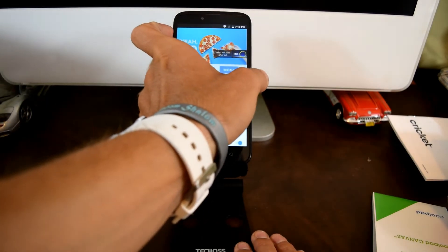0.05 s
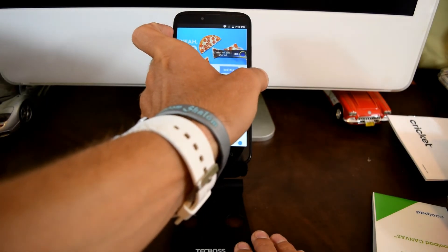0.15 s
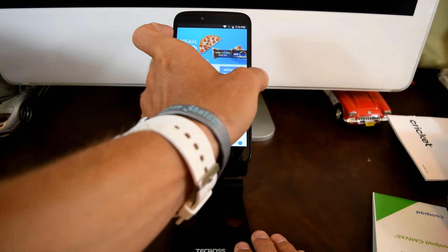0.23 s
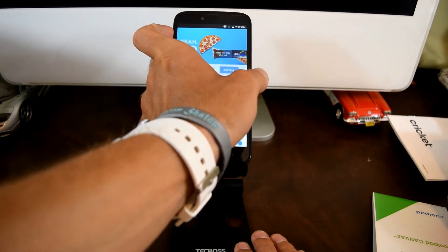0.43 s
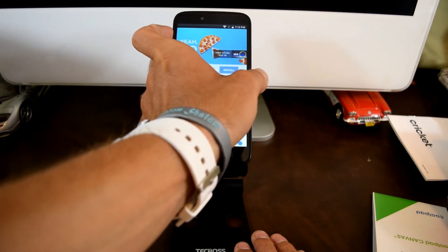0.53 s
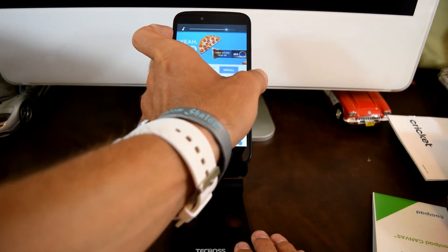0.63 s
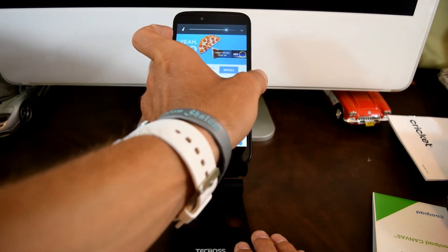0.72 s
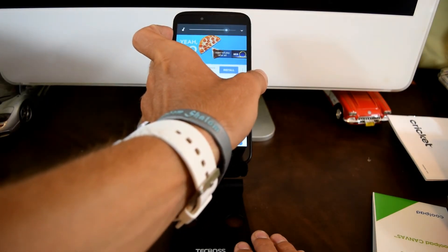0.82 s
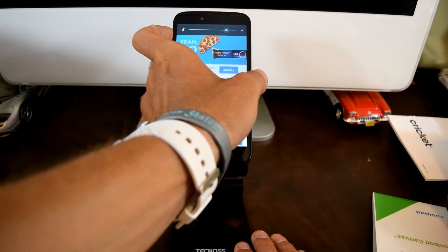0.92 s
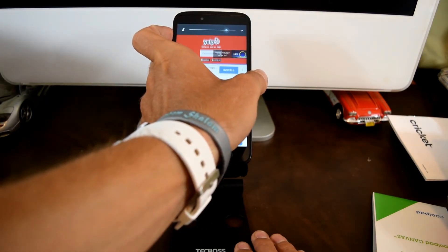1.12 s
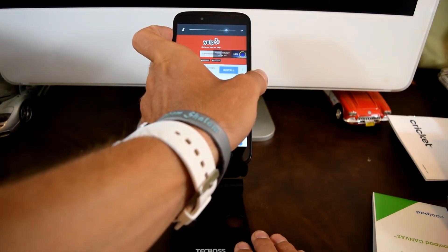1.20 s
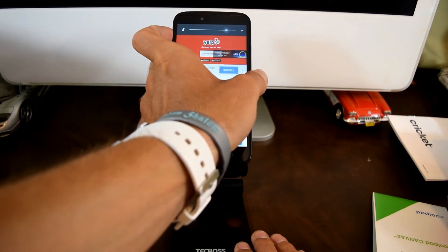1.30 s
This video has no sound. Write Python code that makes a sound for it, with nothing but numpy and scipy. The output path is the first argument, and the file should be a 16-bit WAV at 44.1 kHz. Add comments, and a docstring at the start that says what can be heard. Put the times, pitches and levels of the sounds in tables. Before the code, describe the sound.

Low, muffled thuds and dull rubbing come from a phone being handled at a desk. A button is pressed and released with two faint clicks, then the rumble settles over quiet room hum, microphone hiss and a thin whine.

```python
"""A hand grips a phone at a desk: small shifts reach the microphone as soft, deep bumps in two resonances.
The side button is pressed and clicks faintly, down and up, ringing the case.
A quiet room runs throughout: fan-like murmur, mains hum, a thin wavering whine and microphone hiss."""
import sys
import numpy as np
from scipy import signal
from scipy.fft import rfft, irfft, next_fast_len
from scipy.io import wavfile
from scipy.ndimage import map_coordinates

SR = 44100
rng = np.random.default_rng(int(sys.argv[2]) if len(sys.argv) > 2 else 0)


def int16_out(signal):
    """Quantize to a 16-bit WAV file."""
    q = np.round(np.clip(np.atleast_2d(signal).T, -1, 1) * 32767)
    wavfile.write(sys.argv[1], SR, q.astype(np.int16))


N = 59535

# room murmur spectrum (frequency [Hz], relative density [dB])
MURMUR_SPECTRUM = [(10, -31), (25, -10.5), (50, -3), (75, -6), (130, -0.5), (200, 0.5), (245, -4.5),
                   (280, -18), (345, -9.5), (400, -20.5), (490, -12.5), (680, -25), (950, -21.5),
                   (1250, -29.5), (3000, -29), (6000, -40.5), (16000, -70)]
# steady hum tones (frequency [Hz], rms level [dB])
HUM_TONES = [(59, -53.5), (120, -58), (241, -56.5), (344, -68), (502, -70), (2908, -77)]
# whine contour (time [s], pitch [Hz], rms level [dB])
WHINE_CONTOUR = [(0, 1868, -75), (0.129, 1888, -61.5), (0.269, 1849, -69), (.39, 1837, -64.5),
                 (.52, 1836, -70.5), (.58, 1830, -64.5), (0.701, 1843, -67), (0.781, 1810, -74),
                 (.87, 1833, -65.5), (1.04, 1820, -72), (1.17, 1838, -64.5), (1.35, 1822, -71.5)]
# microphone hiss spectrum (frequency [Hz], relative density [dB])
HISS_SPECTRUM = [(60, -16), (500, 3.5), (1500, 1.2), (3000, 0), (5000, 0.5), (8000, 0.5), (12000, -1),
                 (15700, -2)]
# grip shifts (peak time [s], half-width [s], low resonance level [dB], high resonance level [dB])
GRIP_SHIFTS = [(.21, 0.011, -37, -46), (0.244, 0.015, -29.5, -37.5), (0.264, 0.025, -48, -23),
               (0.334, 0.037, -30, -25.5), (0.39, 0.019, -31.5, -24.5), (0.439, 0.029, -30, -38.5),
               (0.499, 0.0097, -36, -29.5), (.524, 0.012, -39, -39.5), (0.588, 0.025, -29, -24),
               (0.636, 0.014, -30.5, -31), (.708, 0.023, -34.5, -52), (0.777, 0.0072, -48, -35.5),
               (.87, 0.039, -47, -45), (.97, 0.033, -41.5, -47), (1.29, 0.0096, -68, -40)]
# skin friction spectrum (frequency [Hz], relative density [dB])
RUB_SPECTRUM = [(25, -12), (90, 8.5), (150, -3), (230, -9.5), (320, -13.5), (600, -21), (1500, -55),
                (4000, -120)]
# button down, up (time [s], level [dB], second snap delay [s], second snap relative level [dB])
BUTTON_CLICKS = [(0.3462, -38, 0.00127, -10.5), (0.5323, -38.5, 0.00111, -4)]
# case modes (frequency [Hz], relative level [dB], t60 [s])
CASE_MODES = [(1440, -0.5, .008), (2010, 0.5, 0.0044), (2500, -9, 0.0099), (2980, -6.5, 0.011),
              (4530, -4.5, 0.0058)]

TIME_S = np.arange(N) / SR


def amp(db):
    """Decibels to gain."""
    return 10 ** (np.asarray(db) / 20)


def wobble(knots_per_s):
    """Smooth random curve."""
    return map_coordinates(rng.standard_normal(256), [TIME_S * knots_per_s], mode="mirror")


def noise(spectrum):
    """Noise of rms 1, shaped by (frequency [Hz], density [dB]) points on a log axis."""
    size = next_fast_len(N + SR // 2)
    hz, db = np.transpose(spectrum)
    gain = amp(np.interp(np.log(np.fft.rfftfreq(size, 1 / SR) + 1), np.log(hz + 1), db))
    shaped = irfft(rfft(rng.standard_normal(size)) * gain, size)[:N]
    return shaped / np.sqrt(np.mean(shaped ** 2) + 1e-20)


def tone(hz):
    """Sine of peak 1, steady or moving pitch, random phase."""
    return np.sin(2 * np.pi * (np.cumsum(hz * np.ones(N)) / SR + rng.random()))


def murmur(rms_db=-45):
    """Fan-like room noise, mostly low."""
    return amp(rms_db) * noise(MURMUR_SPECTRUM)


def hum():
    """Mains hum plus a few fainter steady tones."""
    return sum(np.sqrt(2) * amp(db) * tone(hz) for hz, db in HUM_TONES)


def whine(wander_hz=4.01, flutter_db=2.5):
    """Thin tone that wavers and sinks a little."""
    times_s, hz, db = np.transpose(WHINE_CONTOUR)
    pitch_hz = np.interp(TIME_S, times_s, hz) + wander_hz * wobble(knots_per_s=30.44)
    level_db = np.interp(TIME_S, times_s, db) + flutter_db * wobble(knots_per_s=24.27)
    return np.sqrt(2) * amp(level_db) * tone(pitch_hz)


def hiss(mid_db=-53.5, side_re_mid_db=-4.5):
    """Even microphone hiss, partly shared by both channels."""
    mid = noise(HISS_SPECTRUM)
    side = amp(side_re_mid_db) * noise(HISS_SPECTRUM)
    return amp(mid_db) * np.array([mid + side, mid - side])


def grip(low_hz=44.02, high_hz=118.86, detune_hz=4.56, rub_re_bumps_db=-17.5):
    """Each shift swells and fades in two resonances, detuned by the grip, with dull skin friction."""
    low_envelope, high_envelope = np.zeros(N), np.zeros(N)
    for peak_s, half_width_s, low_db, high_db in GRIP_SHIFTS:
        swell = np.exp(-((TIME_S - peak_s) / half_width_s) ** 2)
        low_envelope += amp(low_db) * swell
        high_envelope += amp(high_db) * swell
    bumps = np.zeros(N)
    for envelope, hz in [(low_envelope, low_hz), (high_envelope, high_hz)]:
        bumps += envelope * tone(hz + detune_hz * wobble(knots_per_s=45))
    rub = amp(rub_re_bumps_db) * np.hypot(low_envelope, high_envelope) * noise(RUB_SPECTRUM)
    return bumps + rub


def button(case_band_hz=(1110, 4500)):
    """The button snaps over, then hits its stop; the small case rings and radiates in a limited band."""
    ring = np.zeros(N)
    for click_s, click_db, delay_s, second_db in BUTTON_CLICKS:
        for snap_s, snap_db in [(click_s, click_db), (click_s + delay_s, click_db + second_db)]:
            age_s = np.maximum(TIME_S - snap_s, 0)
            for hz, mode_db, t60_s in CASE_MODES:
                envelope = amp(snap_db + mode_db - 60 * age_s / t60_s)
                ring += envelope * np.sin(2 * np.pi * hz * age_s)
    case_filter = signal.butter(4, case_band_hz, "bandpass", fs=SR, output="sos")
    return signal.sosfilt(case_filter, ring)


def scene():
    """Room, grip and button centred; hiss wider."""
    return murmur() + hum() + whine() + hiss() + grip() + button()


def record(dry):
    """Brick-wall low-pass."""
    cutoff_hz = 15750
    size = next_fast_len(N + SR // 2)
    passband = np.fft.rfftfreq(size, 1 / SR) < cutoff_hz
    return irfft(rfft(dry, size) * passband, size)[:, :N]


dry = scene()
out = record(dry)
int16_out(out)
```